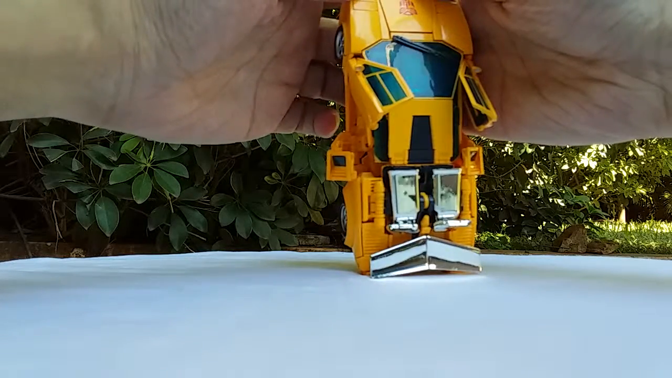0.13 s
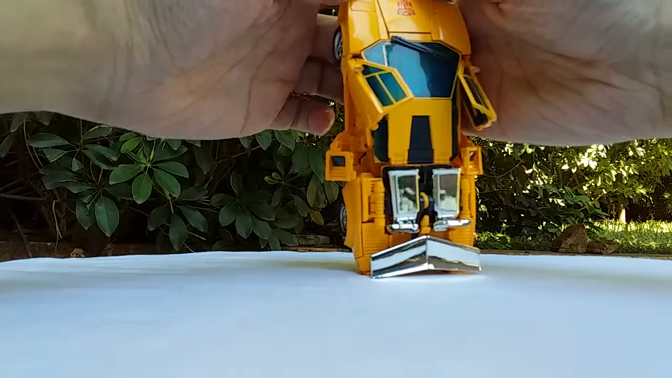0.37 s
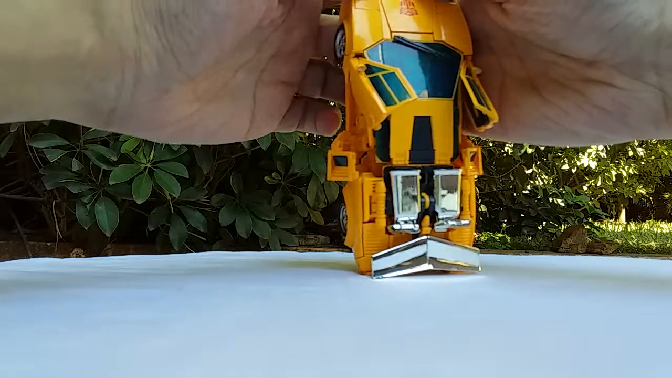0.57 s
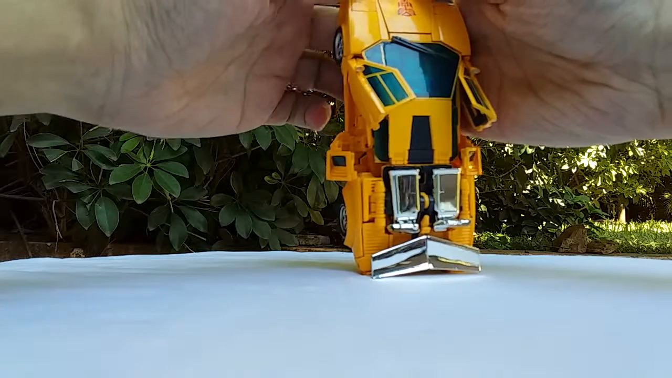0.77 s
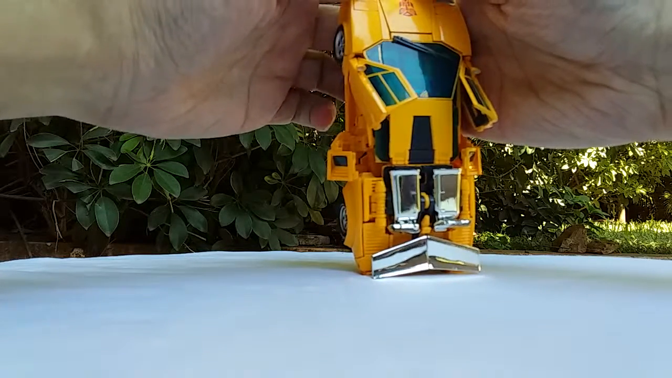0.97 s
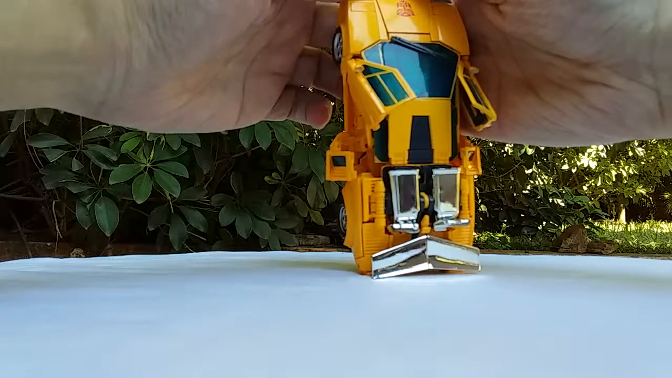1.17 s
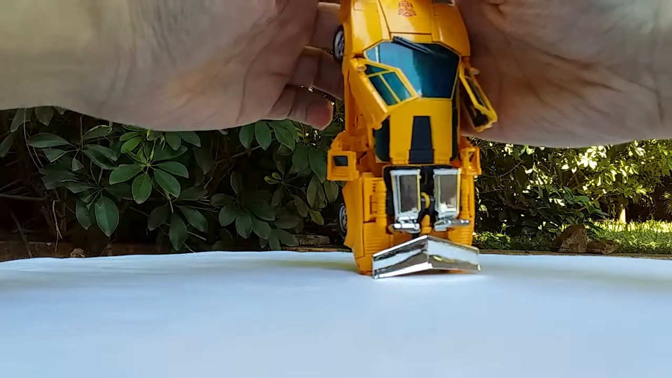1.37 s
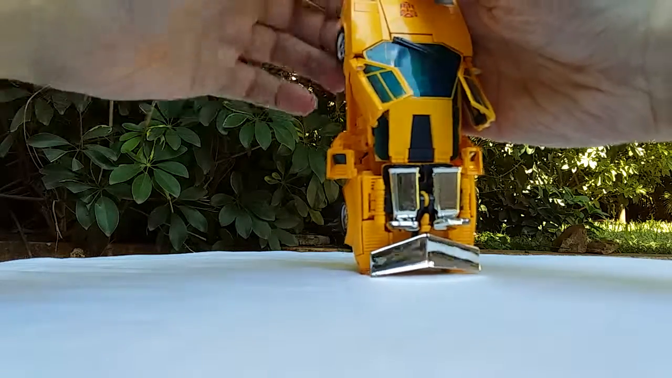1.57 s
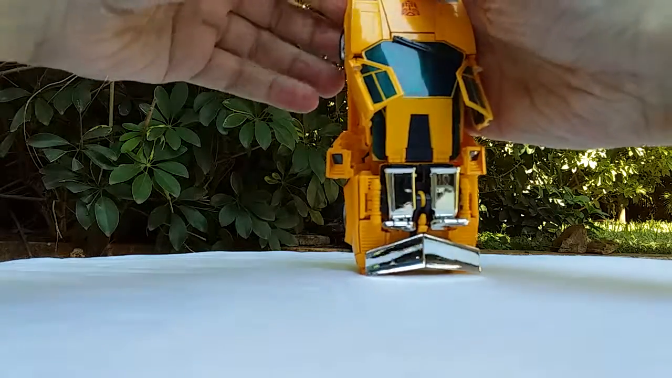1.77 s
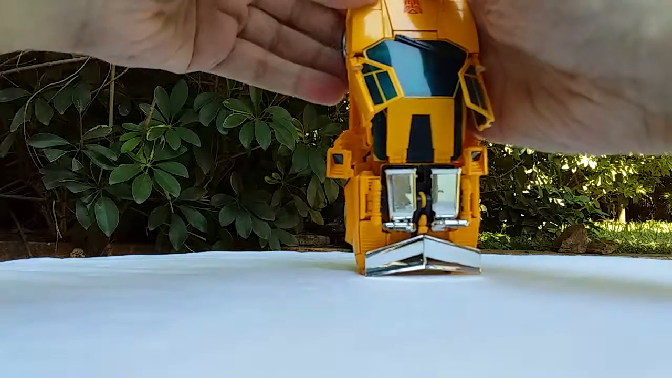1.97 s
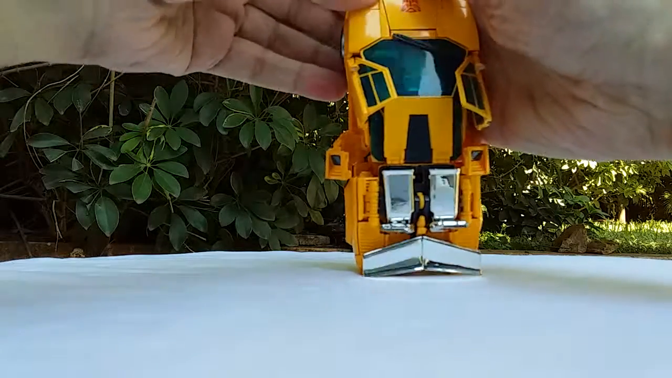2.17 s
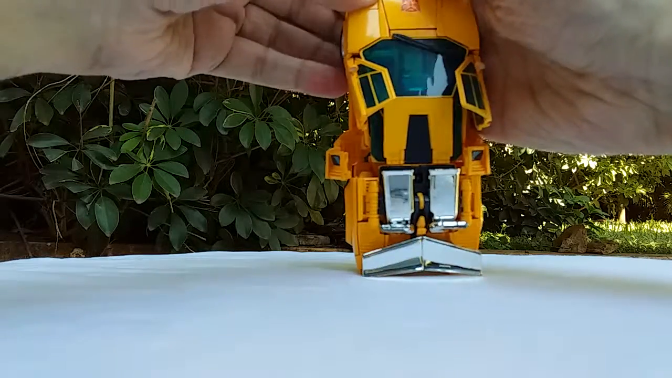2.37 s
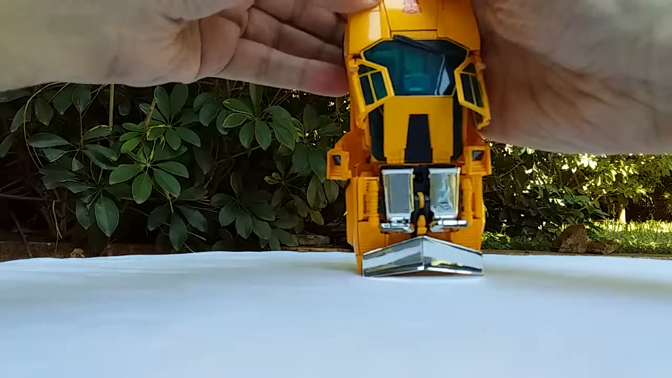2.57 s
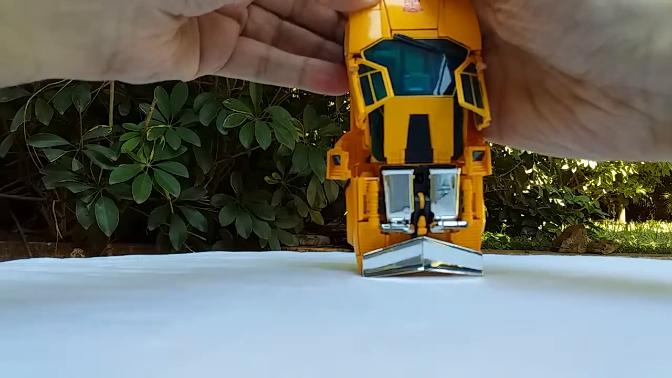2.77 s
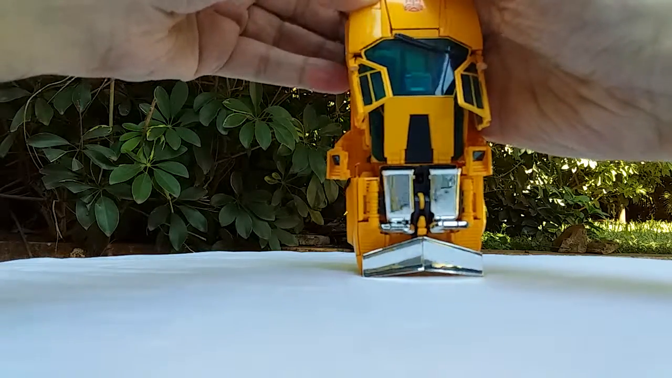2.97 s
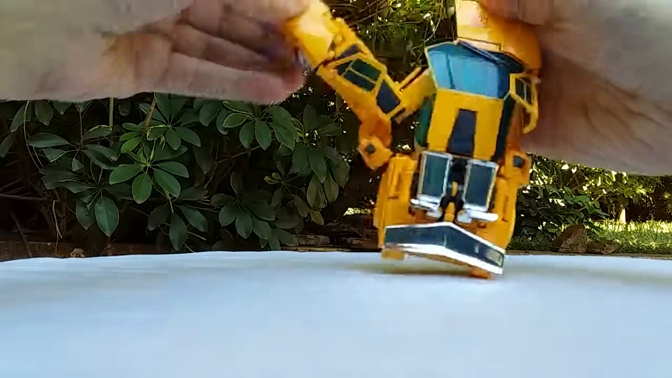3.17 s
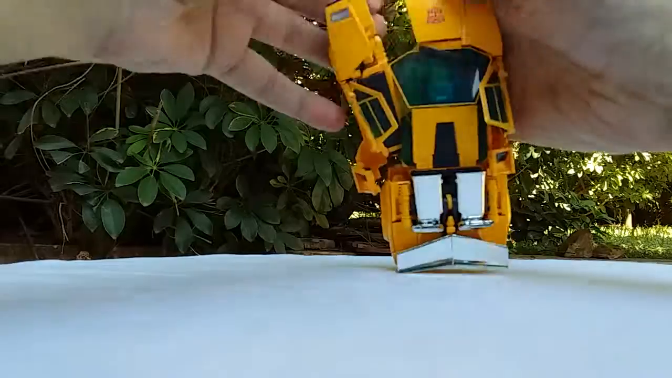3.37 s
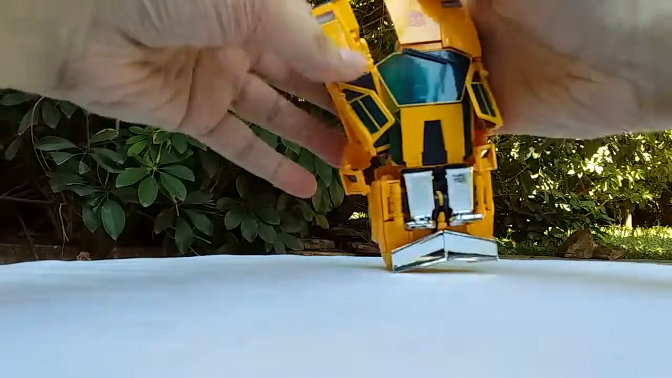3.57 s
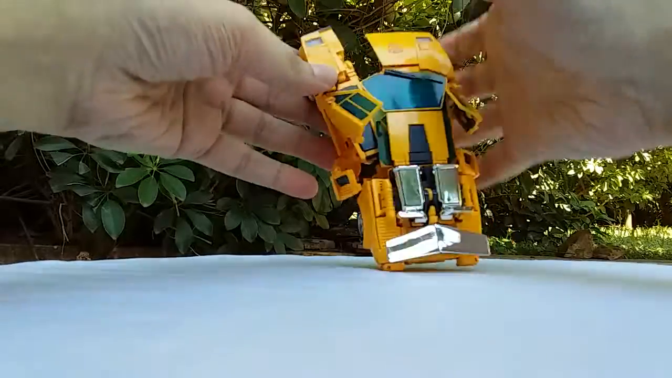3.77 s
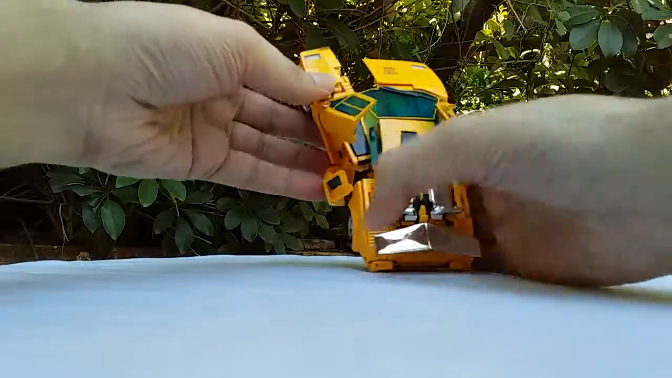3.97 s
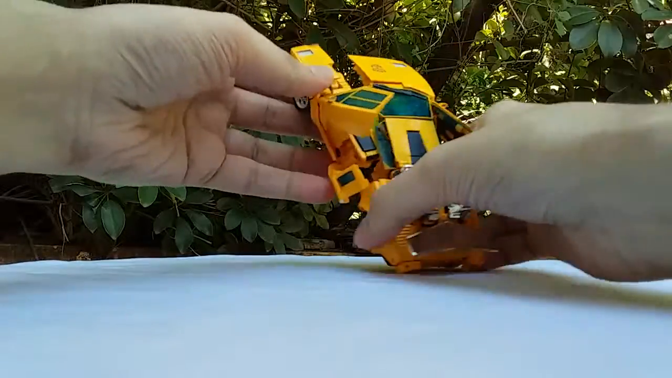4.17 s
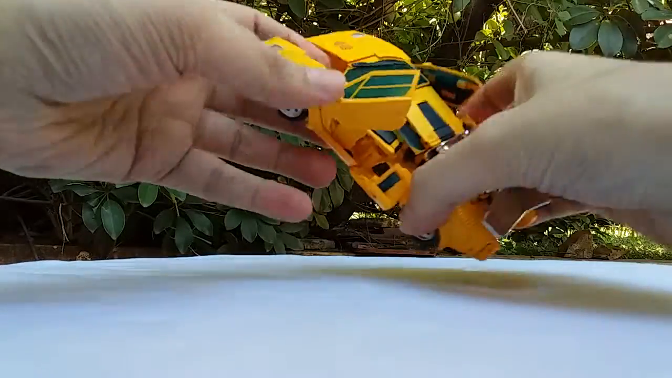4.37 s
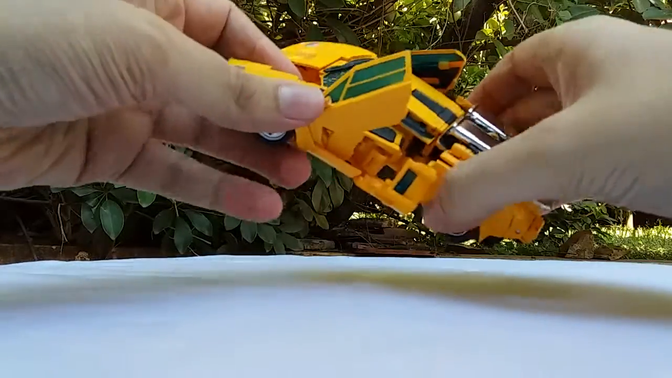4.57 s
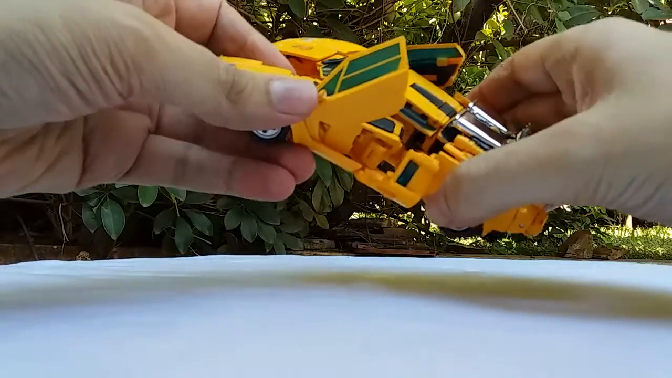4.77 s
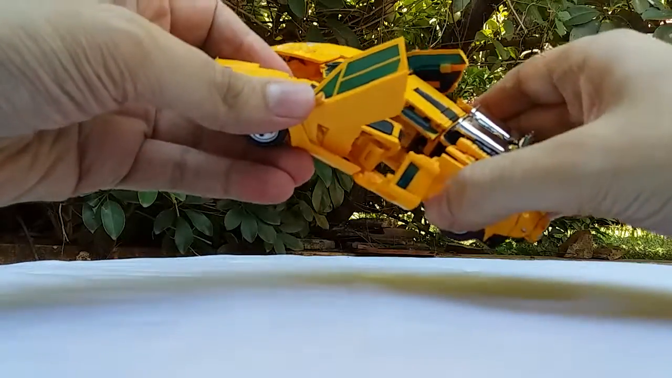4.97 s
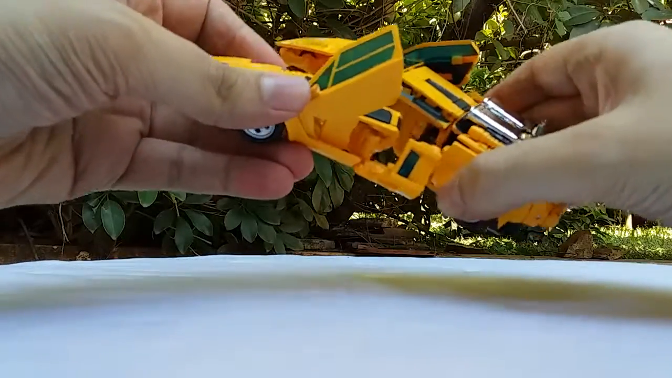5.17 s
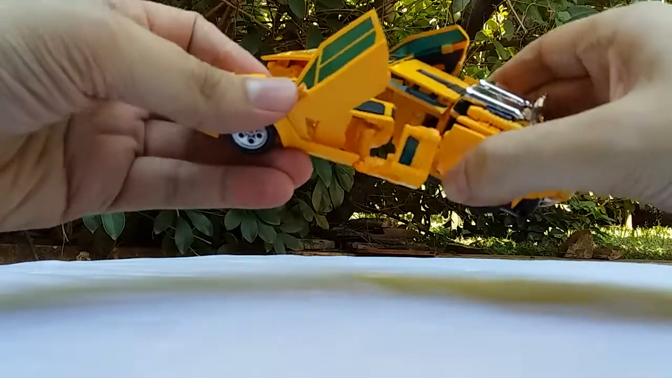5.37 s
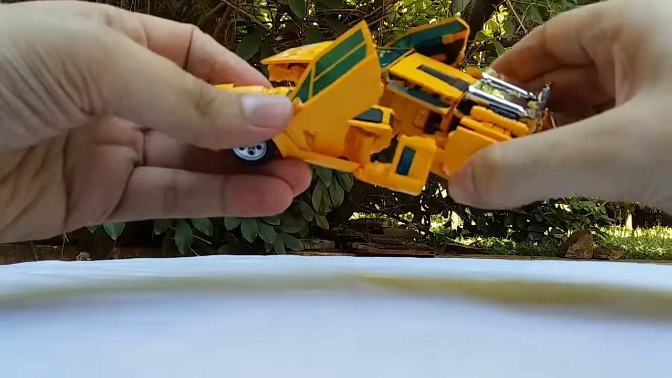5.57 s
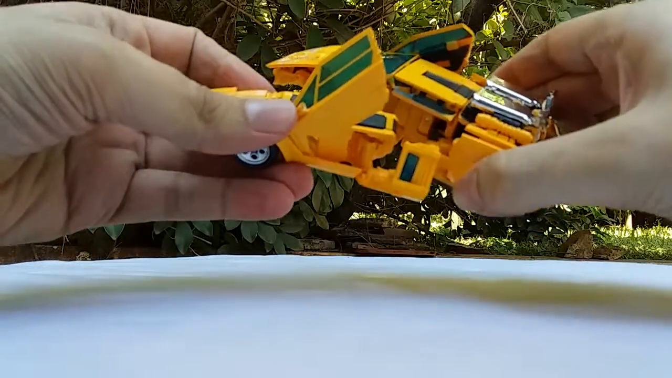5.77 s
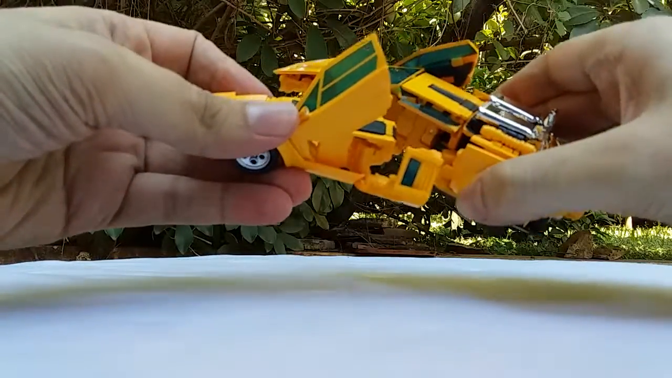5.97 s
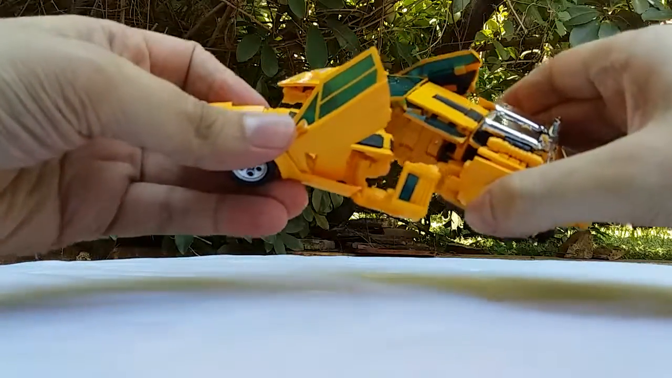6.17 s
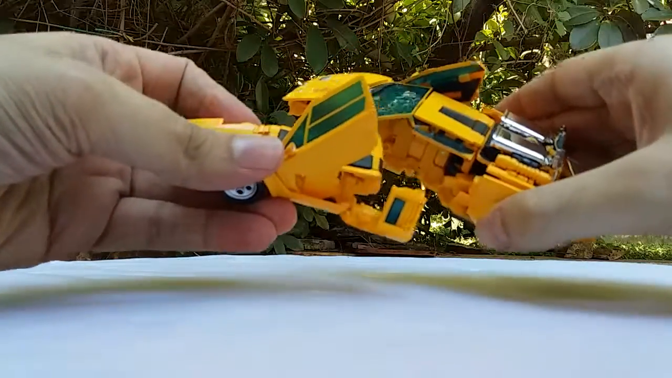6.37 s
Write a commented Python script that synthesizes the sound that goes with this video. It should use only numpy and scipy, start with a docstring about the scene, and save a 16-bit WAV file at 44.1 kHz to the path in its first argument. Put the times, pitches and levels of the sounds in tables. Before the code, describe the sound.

Small plastic ticks and faint hand rubbing, then a burst of loud sharp plastic snaps with a dull thud, over quiet distant traffic rumble.

```python
"""Folding a plastic toy

Hands fold a plastic toy figure on a cloth-covered table in a yard: tabs tick, a joint creaks,
then a panel snaps free with a thud. Each contact is a noise crack, a jittery ring and a dull knock.
Fingers and hinges rub as shaped noise, nearby walls answer as decaying noise,
and the table rings faintly after the loudest snap as a set of fading tones.
Underneath, distant traffic rumbles and air hisses as noise, with a thin electronic whine."""
import sys
import numpy as np
from scipy import signal
from scipy.fft import rfft, irfft, next_fast_len
from scipy.io import wavfile
from scipy.ndimage import map_coordinates

SR = 44100
rng = np.random.default_rng(int(sys.argv[2]) if len(sys.argv) > 2 else 0)


def transcribe(u):
    """Save the signal u as a 16-bit wav file named by the first command-line argument.

    u: samples, shape (n,) or (channels, n), limited to [-1, 1]; the rate is SR.
    q: integer samples, one column per channel.
    """
    v = np.clip(np.atleast_2d(u).T, -1, 1)
    q = np.round(v * 32767).astype(np.int16)
    wavfile.write(sys.argv[1], SR, q)


N = 283563  # length in samples
TIME = np.arange(N) / SR


def amp(db):
    """Turn decibels into a plain factor."""
    return 10 ** (np.asarray(db) / 20)


def unit(x):
    """Scale a sound to rms 1."""
    return x / np.sqrt(np.mean(x ** 2) + 1e-20)


def unit_energy(x):
    """Scale a sound so that its squared samples add up to 1."""
    return x / (np.linalg.norm(x) + 1e-20)


def along(points, hz):
    """Read a curve of (frequency [Hz], value) points on a log frequency axis."""
    point_hz, values = np.transpose(points)
    return np.interp(np.log(hz + 1), np.log(point_hz + 1), values)


def wobble(rate):
    """A smooth random curve through a given number of random knots a second."""
    knots = rng.standard_normal(int(N * rate / SR) + 4)
    return map_coordinates(knots, [TIME * rate])


def add(track, s, sound):
    """Mix a sound into the track at time s."""
    part = track[round(s * SR):][:len(sound)]
    part += sound[:len(part)]


def noise(spectrum):
    """Coloured noise of rms 1."""
    size = next_fast_len(N + SR // 4)
    gain = amp(along(spectrum, np.fft.rfftfreq(size, 1 / SR)))
    return unit(irfft(rfft(rng.standard_normal(size)) * gain, size)[:N])


def coloured(x, spectrum, tilt_db=0):
    """Colour a short sound without smearing it backwards; the tilt [dB per octave] leans its treble."""
    size = len(x)
    hz = np.fft.rfftfreq(size, 1 / SR)
    db = along(spectrum, hz) + tilt_db * np.log2(np.maximum(hz / 2600, 1))
    # folding the cepstrum forward in time gives a minimum-phase filter
    cepstrum = irfft(np.log(amp(db)))
    cepstrum[1:size // 2] *= 2
    cepstrum[size // 2 + 1:] = 0
    return irfft(rfft(x) * np.exp(rfft(cepstrum)))


# colour of the far traffic: (frequency [Hz], relative level [dB per Hz])
TRAFFIC_COLOUR = [(20, -46), (34, -34.5), (43, -1), (50, -1.5), (60, -4.5), (100, -3.5), (145, 1),
                  (210, -7), (380, -8.5), (520, -18.5), (800, -29.5), (1600, -48.5), (4000, -82.5)]
# colour of the air hiss: (frequency [Hz], relative level [dB per Hz])
AIR_COLOUR = [(100, -11), (700, 4.5), (1050, 0), (1350, 8.5), (1650, 2), (2500, -1.5), (4300, -2.5),
              (6000, -6), (8500, -5), (9600, -9.5), (14300, -8), (14700, -3), (15700, -4.5), (15900, -30)]
TRAFFIC_DB, TRAFFIC_SWELL_DB = -56, 1.5
WHINE_HZ = 14766


def background():
    """Far traffic and faint air hiss are shaped noise; the electronic whine is a tone of unsteady pitch."""
    traffic_db = TRAFFIC_DB + TRAFFIC_SWELL_DB * wobble(1.6) + 0.62 * wobble(5.5)
    traffic = amp(traffic_db) * noise(TRAFFIC_COLOUR)
    air = amp(-74.5 + .4 * wobble(3)) * noise(AIR_COLOUR)
    whine_hz = WHINE_HZ + 0.99 * wobble(6)
    whine = amp(-73) * np.sin(2 * np.pi * np.cumsum(whine_hz) / SR)
    return traffic + air + whine


# how long the walls' answer takes to fade by 60 dB: (frequency [Hz], fade time [s])
WALL_FADE = [(100, .7), (500, .65), (1200, .36), (4000, .3), (8000, .25), (14000, 0.47)]
# colour of the sound thrown back: (frequency [Hz], level [dB])
ECHO_COLOUR = [(100, 10.5), (600, 1), (2500, 0), (5000, 1.5), (8500, -3), (12000, -5), (16000, -5.5)]


def yard(x):
    """A quick scatter from hands and table, then the longer answer of the walls, as fading noise."""
    hz, t, grains = signal.stft(rng.standard_normal((2, SR)), SR, nperseg=256)
    colour_db = along(ECHO_COLOUR, hz)[:, None]

    def tail(grain, t60, rise_s):
        shape = amp(colour_db - 60 * t / t60) * (1 - np.exp(-t / rise_s))
        return unit_energy(signal.istft(grain * shape, SR, nperseg=256)[1])

    near = tail(grains[0], 0.073, 0.0023)
    walls = tail(grains[1], along(WALL_FADE, hz)[:, None], 0.0021)
    return signal.fftconvolve(x, amp(-11.0) * near + amp(-20.5) * walls)[:N]


# tones of the ringing table: (frequency [Hz], relative level [dB], time to fade by 60 dB [s])
TABLE_MODES = [(55.7, 2, 0.42), (95.56, 4.5, .5), (323, -5.5, 0.18), (387, -3, 1), (410, 3, 0.63),
               (515, -2.5, 0.58), (592, -6, 0.97), (680, -10, 0.91), (877, -16, .5)]


def table():
    """Low modes of the table that hum on after the hardest snap, each fading at its own pace."""
    out, t = np.zeros(N), np.arange(SR) / SR
    s, db = max(SNAPS, key=lambda row: row[1])[:2]
    ring = sum(amp(mode_db - 60 * t / t60) * np.sin(2 * np.pi * hz * t)
               for hz, mode_db, t60 in TABLE_MODES)
    add(out, s, amp(db - 33) * ring)
    return out


# colour of a crack in thin plastic, also used by the snaps: (frequency [Hz], level [dB])
CRACK_COLOUR = [(300, -45.5), (1400, -18), (2300, -9.5), (3200, -3), (4300, 3), (6400, 0.5), (8400, 6.5),
                (9400, 3.5), (10600, -5), (12800, 1), (15500, -7.5)]
# energy level of the faintest tick, and how far the rare strong ones rise over it
GRIP_DB, GRIP_RANGE_DB = -54, 8


def grip(count=90):
    """Loose parts shifting in the hands give tiny dull ticks, each a short fading burst of noise."""
    out, t = np.zeros(N), np.arange(SR // 100 * 2) / SR
    times = rng.uniform(0, 4.8, count)
    for s, size, tilt in zip(times, rng.random(count), rng.standard_normal(count)):
        burst = rng.standard_normal(len(t)) * amp(-60 * t / .02)
        tick = coloured(burst, CRACK_COLOUR, -11 + 2.5 * tilt)
        # cubing the random size makes strong ticks rare
        add(out, s, amp(GRIP_DB + GRIP_RANGE_DB * size ** 3) * unit_energy(tick))
    return out


# fingers sliding over the shell, one row a stroke: (start [s], end [s], level before fading [dB])
RUBS = [(1.786, 2.772, -69), (3.426, 3.9, -81), (4.142, 5.0, -76)]
# loosened panels dragging on their hinges, one row a turn:
# (time of greatest effort [s], level [dB], half length [s])
TURNS = [(3.17, -44.5, .018), (3.22, -61, .025), (3.296, -39.5, 0.016), (3.385, -61, .04), (3.58, -66, .08),
         (3.753, -72, .08), (4.0, -69, .09), (4.62, -78.5, 0.29), (5.35, -81, 0.086), (5.873, -83, 0.045),
         (6.38, -79, 0.17)]
# colour of skin on the shell: (frequency [Hz], relative level [dB per Hz])
SKIN_COLOUR = [(1000, -10), (3000, -9), (4600, -4), (5800, -14.5), (7700, 5), (9200, -5), (11500, -11),
               (15000, -32)]
# colour of a dragging hinge: (frequency [Hz], relative level [dB per Hz])
HINGE_COLOUR = [(400, -20), (1200, -7.5), (3400, -0.5), (4600, 1.5), (6000, -8.5), (8200, 2.5),
                (10500, -14), (16000, -12)]
# each stroke gathers speed, fades, slows and lifts off
RUB_ATTACK_S, RUB_RELEASE_S, RUB_FADE_DB_PER_S = 0.24, 0.24, 5
SLIP_DB, BURST_DB = 4.2, 2.6  # unevenness of a hinge from slip to slip, and from burst to burst


def friction():
    """Skin hisses smoothly on the shell; hinges drag in uneven bursts of tiny slips with each turn."""
    slide = np.zeros(N)
    for start, end, db in RUBS:
        attack = np.clip((TIME - start) / RUB_ATTACK_S, 0, 1)
        release = np.clip((end - TIME) / RUB_RELEASE_S, 0, 1)
        slide += attack * release * amp(db - RUB_FADE_DB_PER_S * (TIME - start))
    effort = sum(amp(db) * np.exp(-.5 * ((TIME - s) / half) ** 2) for s, db, half in TURNS)
    skin_flutter = amp(1.8 * wobble(110) + 1.2 * wobble(8.12))
    hinge_flutter = amp(SLIP_DB * wobble(350) + BURST_DB * wobble(35))
    skin = slide * unit(noise(SKIN_COLOUR) * skin_flutter)
    hinge = effort * unit(noise(HINGE_COLOUR) * hinge_flutter)
    return skin + hinge


# soft pushes of hands and toy on the table:
# (time [s], level [dB], pitch [Hz], length [s], rumble relative to the push [dB])
THUDS = [(3.137, -43, 242, .02, -0.5), (3.259, -26, 132.7, 0.017, -8), (3.268, -33.5, 70.2, 0.03, -6),
         (3.396, -43.5, 302, 0.011, -0.5), (3.962, -52, 125, .05, -0.5)]
# dull rumble of the table top under a push: (frequency [Hz], relative level [dB per Hz])
BOARD_COLOUR = [(20, -24), (45, 1.5), (90, -3), (160, -9.5), (250, -3), (400, -1), (520, -5), (660, -13),
                (800, -28), (2000, -59.5)]


def thuds():
    """A soft push moves the table for only a few cycles, and its top rumbles briefly."""
    out, board = np.zeros(N), noise(BOARD_COLOUR)
    for s, db, hz, length, rumble_db in THUDS:
        t = np.maximum(TIME - s, 0)
        push = np.sin(np.pi * np.minimum(t / length, 1)) * np.sin(2 * np.pi * hz * t)
        rumble = board * amp(rumble_db - 60 * t / .13) * (1 - np.exp(-t / .008))
        out += amp(db) * (push + rumble)
    return out


# plastic contacts: (time [s], level over 2 ms [dB rms], time for the crack to fade by 60 dB [s],
# treble tilt of the crack [dB per octave], strongest mode of the part that moved [Hz],
# ring relative to the crack [dB])
SNAPS = [(0.0696, -50, .008, 2, 7870, -3), (0.078, -51.5, 0.0098, 4, 5940, 1),
         (0.2148, -61, 0.012, -21, 4000, -5), (0.3838, -59, 0.016, -14, 3100, -2),
         (0.4734, -43, 0.022, -0.5, 8200, -7), (0.482, -45, 0.021, 0, 7630, 3),
         (0.521, -53.5, 0.0084, -6, 5500, -1), (0.678, -59.5, .008, 7, 8500, 8),
         (0.7009, -55, .006, 11, 9040, -2), (1.0795, -62, 0.0053, -11, 4970, -6),
         (1.2313, -32.5, 0.0074, -6, 4760, -1), (1.234, -47.5, 0.2, -9, 2353, 0),
         (1.2901, -56, 0.0059, -9, 4970, -8), (1.3245, -46, 0.0055, -0.5, 7500, 1),
         (1.4751, -56, 0.0094, -5, 2040, 0), (1.4832, -56.5, 0.029, -7, 5900, -12),
         (1.5024, -50.5, 0.0086, -11, 3950, -12), (1.508, -51, 0.028, -15, 7560, 2),
         (1.8308, -62, .008, -12, 4780, -1), (1.8859, -53, 0.008, -9, 4030, -6),
         (2.4955, -49.5, 0.0029, -2, 9400, -3), (2.578, -57, .025, -17, 3830, 2),
         (2.634, -52.5, .007, -3, 4520, 6), (2.655, -46.5, 0.0088, 3, 8180, -2),
         (2.6786, -50.5, 0.0097, 0, 4430, 7), (2.902, -55.5, 0.013, -1, 7500, -9.5),
         (3.081, -61, .008, -0.5, 7500, -6), (3.094, -54, 0.01, -4, 7450, -1),
         (3.11, -57, .008, -0.5, 8100, -2.5), (3.1348, -31.5, 0.015, -7.5, 4230, -9),
         (3.1369, -29, 0.0069, -6, 11160, 0), (3.142, -35.5, .02, 3, 3407, 0.5),
         (3.148, -34, 0.0077, -14, 3350, 1.5), (3.1742, -29, 0.0086, -4, 3900, -10.5),
         (3.1775, -32.5, 0.011, -1, 5170, 4), (3.1823, -33.5, .007, -5, 3270, 9),
         (3.198, -42, 0.0068, -10, 4130, -9), (3.2072, -35.5, 0.0093, 5, 8176, -5),
         (3.212, -39, 0.015, -3.5, 6975, -2), (3.228, -41, .022, -22, 3274, 5),
         (3.2768, -29.5, .007, -9, 7620, 3), (3.2784, -28.5, 0.0064, 14, 10780, 0),
         (3.2915, -25, .027, 9, 7624, -2), (3.2968, -16, .008, 1.5, 7620, -11),
         (3.301, -13.5, .005, -7.5, 4384, 4), (3.3024, -14.5, 0.0055, -1, 4053, -3.5),
         (3.3055, -21.5, .014, -13, 7950, -4), (3.308, -21.5, .014, 2, 2430, 1),
         (3.317, -21.5, .008, -5, 2000, -6), (3.3265, -32.5, 0.0068, -18, 3420, 8),
         (3.4037, -23, 0.0088, -1, 4420, -0.5), (3.4053, -28.5, .008, -8, 2360, 9),
         (3.461, -51, .008, 10, 4060, 4.5), (3.4807, -36, 0.0058, -12, 4060, 4),
         (3.5728, -47.5, 0.018, -6, 4900, 0), (3.6685, -49.5, 0.0082, -4.5, 4760, -4),
         (3.705, -57.5, .009, -11.5, 3120, -1), (3.899, -37, 0.017, -5.5, 3420, 2.5),
         (3.9272, -50, .008, -10, 8710, -3), (3.94, -34, 0.013, -8, 3440, 20.5),
         (3.9481, -38.5, 0.0071, -2, 7320, 3.5), (3.9585, -50.5, 0.012, -4, 6930, -10),
         (3.9949, -54, 0.011, -8, 3140, -2), (4.0504, -56, 0.032, -2, 3396, 10),
         (4.2897, -47.5, 0.0068, -20.5, 6670, 11), (4.297, -54, 0.011, -16, 4420, 13),
         (4.383, -61, 0.017, -7, 4500, -5), (4.613, -57, .01, 11, 4050, 0.5),
         (4.622, -50.5, 0.016, 11.5, 4016, -4.5), (4.6822, -48.5, 0.022, 3.5, 11750, -1),
         (4.689, -50.5, .03, -1.5, 3934, -2.5), (4.8444, -55, 0.0087, 7.5, 7430, -3),
         (5.8248, -47, 0.0083, 0.5, 8680, 10.5), (5.826, -53.5, 0.034, -3, 4480, 7),
         (6.0696, -52.5, 0.0069, -2.5, 8700, 6.5), (6.2373, -55, 0.011, -2, 8700, 2)]
# colour of a knock of the hollow body: (frequency [Hz], level [dB])
KNOCK_COLOUR = [(60, -27), (250, -1.5), (400, 2.5), (600, -4.5), (800, 1), (1100, -0.5), (1400, -4),
                (2100, 4), (2800, -8.5), (4200, -27.5), (9000, -50)]
# modes of the thin shell, shared by every contact: (frequency [Hz], level [dB])
SHELL_MODES = [(2330, -10.5), (3450, -3), (4450, -1), (5300, -0.5), (7750, 2.5), (8800, -4.5)]
SHELL_DB = -6.5  # the shell's ring, relative to that of the part that moved
# knock of the hollow body relative to the crack: held loosely, and pressed on the table
KNOCK_DB, PRESSED_KNOCK_DB = -24, -6.5
PRESSED_FROM_S, PRESSED_TO_S = 3.1, 3.43  # while the toy is wrenched open against the table


def snaps(size=4096):
    """Each slip cracks thin plastic, rings part and shell, knocks the body: (direct, spread all round)."""
    direct, spread, t = np.zeros(N), np.zeros(N), np.arange(size) / SR

    def swell(t60):
        # a contact is a cluster of tiny slips, so even a sharp one takes a moment to swell
        return amp(-60 * t / t60) * (1 - np.exp(-t / (.06 * t60)))

    def burst(t60):
        return rng.standard_normal(size) * swell(t60)

    def mode(hz):
        # random jitter of the pitch blurs the tone
        jittery_hz = hz + 1300 * rng.standard_normal(size)
        return np.sin(2 * np.pi * np.cumsum(jittery_hz) / SR)

    def crack(t60, tilt_db):
        return unit_energy(coloured(burst(t60), CRACK_COLOUR, tilt_db))

    for s, db, t60, tilt_db, ring_hz, ring_db in SNAPS:
        strength = amp(db) * np.sqrt(SR / 500)  # the energy of this rms level held for 2 ms
        pressed = PRESSED_FROM_S < s < PRESSED_TO_S
        knock_db = PRESSED_KNOCK_DB if pressed else KNOCK_DB
        part = unit(mode(ring_hz))
        shell = unit(sum(amp(mode_db) * mode(hz) for hz, mode_db in SHELL_MODES))
        ring = amp(ring_db) * unit_energy((part + amp(SHELL_DB) * shell) * swell(1.1 * t60))
        knock = amp(knock_db) * unit_energy(coloured(burst(0.81 * t60), KNOCK_COLOUR))
        add(direct, s, strength * unit_energy(crack(t60, tilt_db) + ring + knock))
        # summed over all directions, the ring of a single panel stands out less
        add(spread, s, strength * unit_energy(crack(t60, tilt_db) + amp(-8) * ring + knock))
    return direct, spread


def scene():
    """Mix the sources; the yard answers the snaps and the handling."""
    direct, spread = snaps()
    handling = thuds() + friction() + grip()
    echoes = yard(spread + handling)
    return (direct + handling + echoes + table() + background())[None]


LOW_CUT_HZ, TOP_HZ = 32, 16300  # both are the points of half amplitude


def record(dry):
    """Roll off the deepest rumble, and fade out the treble over 400 Hz around the top limit."""
    size = next_fast_len(N + SR // 4)
    hz = np.fft.rfftfreq(size, 1 / SR)
    low_cut = 1 - 1 / (1 + (hz / LOW_CUT_HZ) ** 8)
    edge = np.clip((TOP_HZ - hz) / 400 + .5, 0, 1)
    high_cut = np.sin(np.pi / 2 * edge) ** 2
    return irfft(rfft(dry, size) * low_cut * high_cut, size)[:, :N]


dry = scene()
out = record(dry)
transcribe(out)
```